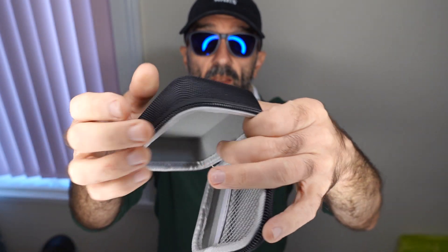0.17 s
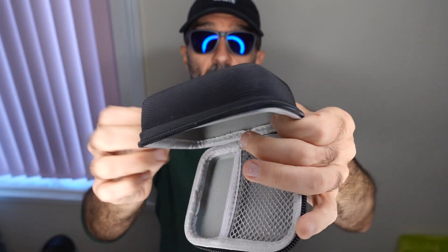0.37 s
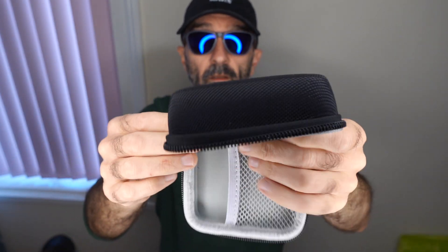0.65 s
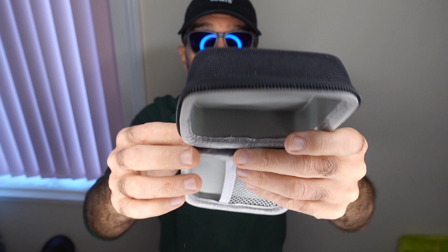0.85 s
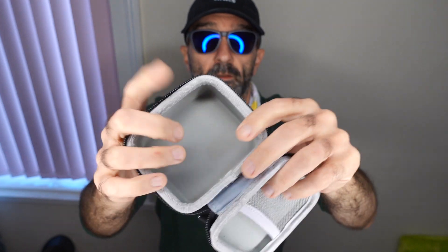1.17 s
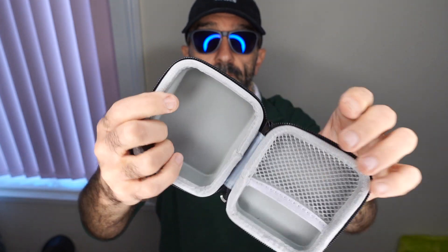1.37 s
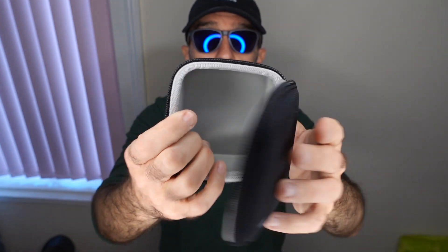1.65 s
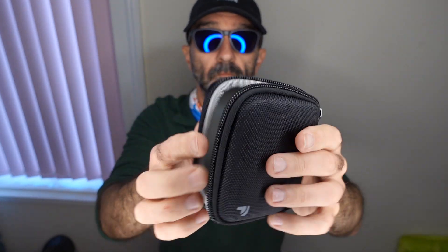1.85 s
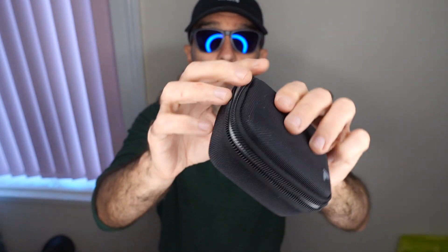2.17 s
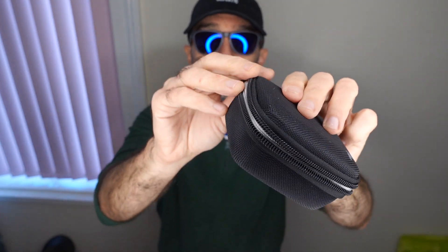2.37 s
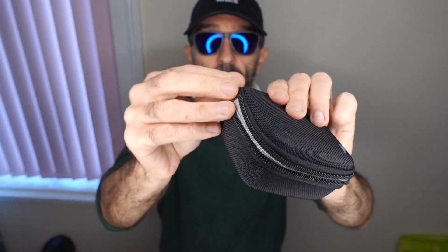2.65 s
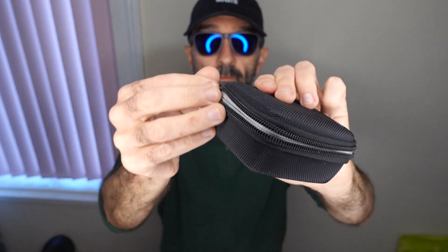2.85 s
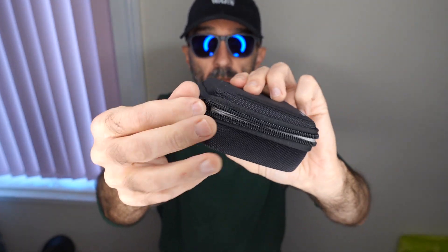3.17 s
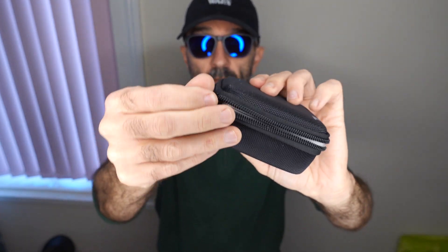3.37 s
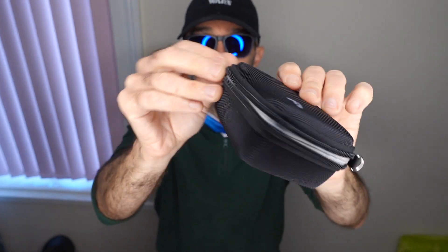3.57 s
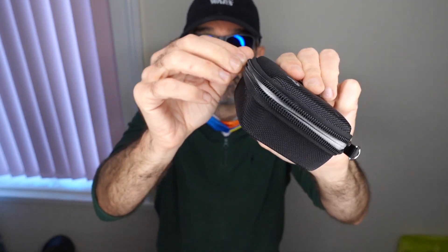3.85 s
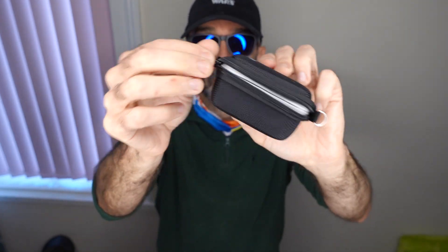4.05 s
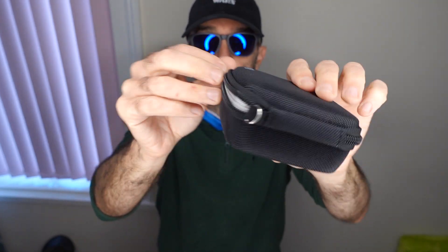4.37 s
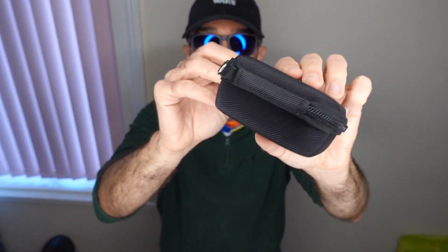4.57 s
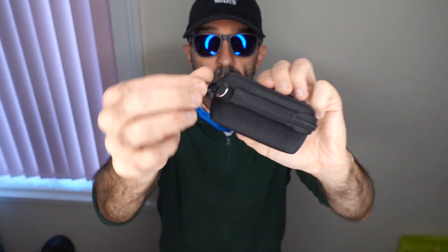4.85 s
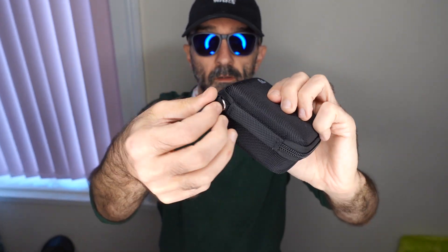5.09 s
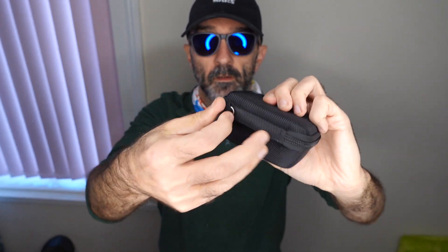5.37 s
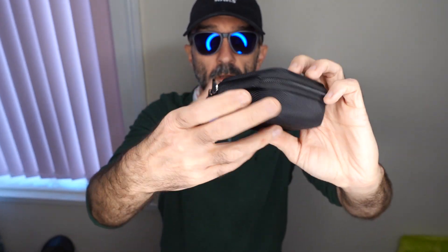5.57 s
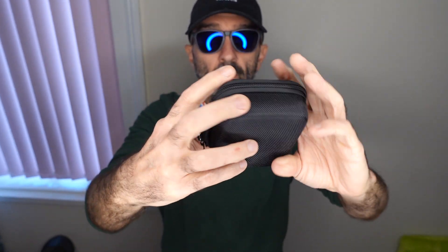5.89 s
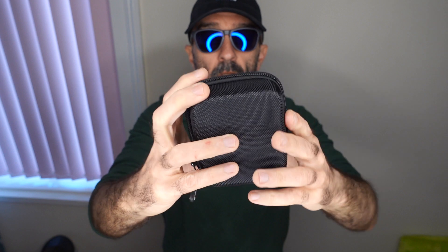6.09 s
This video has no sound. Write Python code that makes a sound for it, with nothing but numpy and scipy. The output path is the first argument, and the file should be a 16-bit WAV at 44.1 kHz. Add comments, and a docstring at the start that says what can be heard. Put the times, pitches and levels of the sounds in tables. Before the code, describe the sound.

Close scratchy rubbing on a woven hollow shell, sharp ticks and a firm closing knock, then three brief zipper pulls and final taps.

```python
"""Closing and zipping a small hard case

Hands turn a fabric-covered hard case close to two microphones, fold it shut and zip it in three pulls.
Grainy noise scrapes the weave and drums the hollow shell; filtered impulses tick, decaying modes knock.
Each zip pull is a buzz of harmonics gliding with the tooth rate, led into by single teeth.
A small room answers over a low rumble; the hands wander from the left to the right."""
import sys
import numpy as np
from scipy import signal
from scipy.fft import rfft, irfft, next_fast_len
from scipy.io import wavfile
from scipy.ndimage import uniform_filter1d, map_coordinates

SR = 44100
rng = np.random.default_rng(int(sys.argv[2]) if len(sys.argv) > 2 else 0)


def persist_wave(psi):
    """Save psi, clipped to +-1, as 16-bit WAV."""
    counts = np.round(np.clip(psi, -1, 1) * 32767).astype(np.int16)
    wavfile.write(sys.argv[1], SR, np.atleast_2d(counts).T)


N = 274302
TIME = np.arange(N) / SR

# relative spectrum of skin and nails on the weave: frequency_hz, density_db (per Hz)
SCRAPE_SPECTRUM = [(300, -61), (900, -7.5), (1500, -3), (2200, -0.75), (4800, 0.5), (6600, -1), (8200, -13),
                   (10000, -15.5), (11500, -22.5), (16000, -26)]


def gain_of(db):
    """Amplitude factor for a level in dB."""
    return 10 ** (np.asarray(db) / 20)


def evened(x):
    """Scales x to an RMS of one."""
    return x / np.sqrt(np.mean(x ** 2) + 1e-20)


def read(points, hz):
    """A spectrum joined by straight lines on a log-frequency axis."""
    f, value = np.transpose(points)
    return np.interp(np.log(hz + 1), np.log(f), value)


def curves(rows, t=TIME):
    """Every column of a table of (s, value, ..) rows at the times t."""
    s, *columns = np.transpose(rows)
    return [np.interp(t, s, c) for c in columns]


def add(mix, s, sound):
    """Mixes a sound in at s seconds, cut off at the end of the mix."""
    part = mix[:, round(s * SR):][:, :sound.shape[-1]]
    part += sound[..., :part.shape[1]]


def colour(x, points):
    """Filters x by a spectrum."""
    n = x.shape[-1]
    size = next_fast_len(n)
    gain = gain_of(read(points, np.fft.rfftfreq(size, 1 / SR)))
    return irfft(rfft(x, size) * gain, size)[..., :n]


def pair(n):
    """White noise at the two microphones: alike in the bass, less so in the treble."""
    # left-right likeness: frequency_hz, correlation (0 to 1)
    likeness = [(40, 1), (80, 0.81), (150, 0.89), (700, 0.93), (1400, 0.55), (5000, 0.11)]
    a, b = rfft(rng.standard_normal((2, n)))
    same = np.clip(read(likeness, np.fft.rfftfreq(n, 1 / SR)), 0, 1)
    mid = a * np.sqrt((1 + same) / 2)
    side = b * np.sqrt((1 - same) / 2)
    return irfft(np.array([mid + side, mid - side]), n)


def rumble(level_db=-50):
    """A steady low noise behind the handling."""
    # relative spectrum: frequency_hz, density_db (per Hz)
    rumble_spectrum = [(20, -2), (100, 4), (200, 0), (600, -7), (16000, -64)]
    return gain_of(level_db) * evened(colour(pair(N), rumble_spectrum))


def room(x, gap_s=0.011, standing_t60=0.43):
    """A small room: a diffuse tail whose decay varies with frequency, and standing waves that sing on."""
    # diffuse tail: frequency_hz, t60_s, level_db
    bands = [(148, 0.19, -5), (260, 0.7, -1.5), (480, 0.63, -10.5), (1200, 0.59, -9.5), (2950, 0.34, -5.5),
             (14000, 0.54, -17)]
    # standing waves: pitch_hz, level_db
    standing = [(405, -61), (444, -63), (590, -55.5), (615, -60), (1170, -61), (1205, -60)]
    bin_hz, t, z = signal.stft(pair(SR * 3 // 4), SR, nperseg=256)
    t60, wet_db = (read(np.array(bands)[:, [0, column]], bin_hz)[:, None] for column in (1, 2))
    energy = t60 * SR / np.log(1e6)  # of the decay, so that level and length stay independent
    decaying = z * gain_of(wet_db - 60 * t / t60) / np.sqrt(energy)
    tail = signal.istft(decaying, SR, nperseg=256)[1]
    t = np.arange(tail.shape[1]) / SR
    for hz, standing_db in standing:
        tail += gain_of(standing_db - 60 * t / standing_t60) * np.cos(2 * np.pi * hz * t)
    fade_in = 1 - np.exp(-(t / gap_s) ** 2)
    return signal.fftconvolve(x, tail * fade_in, axes=1)[:, :N]


def bump(db, hz=75, decay_s=0.0037, rise_s=0.00075):
    """The whole case moves as one body: a soft push of air, gone within a cycle or two."""
    t = np.arange(0, 6 * decay_s, 1 / SR)
    envelope = (1 - np.exp(-t / rise_s)) * np.exp(-t / decay_s)
    return gain_of(db) * 2 * np.sin(2 * np.pi * hz * t) * envelope


def hollow(x, fade_s=0.51):
    """The open lid cups the rubbing and colours it until it is turned away."""
    # air resonances in the lid: pitch_hz, width_hz, level_db
    resonances = [(1080, 110, 4), (2230, 720, 2)]
    ring = 0
    for hz, width_hz, db in resonances:
        ring = ring + gain_of(db) * signal.lfilter(*signal.iirpeak(hz, hz / width_hz, SR), x)
    return ring * np.exp(-(TIME / fade_s) ** 2)


def knock(db, hz, cycles=0.76, upper=1.567, upper_db=-8, rise_s=0.0014):
    """The padded shell rings briefly in two modes; db sets its energy as if spread over 6 ms."""
    t = np.arange(1800) / SR
    modes = np.sin(2 * np.pi * hz * t) + gain_of(upper_db) * np.sin(2 * np.pi * upper * hz * t)
    ring = modes * np.exp(-t * hz / cycles) * (1 - np.exp(-t / rise_s))
    # a small shell radiates little below its pitch
    ring = signal.lfilter(*signal.butter(1, hz / 2, "high", fs=SR), ring)
    return gain_of(db) * ring / np.sqrt((ring ** 2).sum() / (.006 * SR))


def click(db, hz, decay_s=0.00083, rattle_db=-11, width_share=1.0, crack_db=-15):
    """A hard contact: an impulse and rattle in a broad resonance; db sets its energy as if over 4 ms."""
    t = np.arange(500) / SR
    burst = (t == 0) + gain_of(rattle_db) * pair(len(t)) * np.exp(-t / decay_s)
    b, a = signal.iirpeak(hz, 1 / width_share, SR)
    resonance = signal.lfilter(b, a, signal.lfilter(b, a, burst))
    tick = resonance + gain_of(crack_db) * burst
    tick /= np.sqrt((tick ** 2).sum(1, keepdims=True) / (.004 * SR))
    return tick * gain_of(db)


def grains(per_s, spread_db, decay_s, count=24):
    """Fibres catching and letting go: tiny bursts at random moments, a few much larger than the rest."""
    t = np.arange(400) / SR
    out, total = np.zeros((2, N + len(t))), int(per_s * N / SR)
    bursts = [pair(len(t)) * np.exp(-t / decay_s) for _ in range(count)]
    when, chance, shape = rng.random((total, 3)).T
    size = gain_of(spread_db * np.minimum(-np.log(1 - chance), 4))
    for k, burst in enumerate(bursts):
        mine = (shape * count).astype(int) == k
        starts = (when[mine] * N).astype(int)
        at = (starts[:, None] + np.arange(len(t))).ravel()
        for ear in range(2):
            out[ear] += np.bincount(at, np.outer(size[mine], burst[ear]).ravel(), out.shape[1])
    return evened(out[:, :N])


def patchy(x, patch_db=3.0, lasting_frames=6, wide_bins=4):
    """The moving fingers load the panel differently: resonances come and go, less so in the treble."""
    hz, t, z = signal.stft(x, SR, nperseg=512, noverlap=384)
    field = rng.standard_normal(z.shape[1:])
    for _ in range(2):
        field = uniform_filter1d(field, wide_bins, 0)
        field = uniform_filter1d(field, lasting_frames, 1)
    depth = .5 + 1 / (1 + (hz[:, None] / 3500) ** 2)
    gain = gain_of(patch_db * evened(field) * depth)
    gain /= np.sqrt((gain ** 2).mean(1, keepdims=True))  # keeps the average spectrum
    return signal.istft(z * gain, SR, nperseg=512, noverlap=384)[1][:, :N]


def effort(sag_db=3.5, release_s=0.021, grip_shell_db=-8, grip_fizz_db=5):
    """Scrape, shell and fizz in dB: strokes swell, sag and die away over the light rubbing of the grip."""
    # finger and slider strokes, before the trims in rubbing(): start_s, length_s, attack_s,
    # scrape_db, shell_db (over the scrape), fizz_db (extra treble)
    strokes = [(0.0, 0.13, 0.013, -31, -3.5, 11), (0.075, 0.069, 0.055, -18, -5, 10),
               (0.485, 0.014, 0.01, -20, -3.5, -8), (0.537, 0.16, 0.11, -16, -5.5, 2.5),
               (0.715, 0.087, 0.011, -27, -24, 1.5), (0.81, 0.15, 0.053, -21.5, -12, -2),
               (1.044, 0.074, 0.085, -16, -11.5, -1.5), (1.144, 0.098, 0.12, -16, -11, -4),
               (1.248, 0.19, 0.026, -26, -31, 9), (1.639, 0.054, 0.039, -16.5, -6, 0),
               (1.705, 0.22, 0.03, -24, -14, 4.5), (1.82, 0.11, 0.076, -17, -4, -8),
               (2.19, 0.21, 0.0082, -30.5, -3.5, -1), (2.333, 0.083, 0.056, -22, -4.5, -4),
               (2.494, 0.072, 0.062, -21, -7.5, 6), (2.598, 0.13, 0.025, -27.5, -9.5, -1),
               (2.818, 0.031, 0.018, -27, -9, 4), (2.868, 0.072, 0.026, -21.5, -9.5, 9),
               (2.969, 0.2, 0.044, -17.5, -2.5, 2.5), (3.653, 0.074, 0.079, -23.5, 2, 12.5),
               (3.783, 0.088, 0.062, -20, -31, 8.5), (3.948, 0.18, 0.047, -13, -11, 2.5),
               (4.183, 0.062, 0.035, -23.5, -37, 13.5), (4.446, 0.08, 0.068, -23, -2, 11.5),
               (4.564, 0.19, 0.18, -22.5, -11, 10), (4.784, 0.053, 0.036, -11.5, -13.5, 4),
               (4.839, 0.099, 0.034, -15.5, -11.5, 1.5), (5.173, 0.021, 0.028, -12, -3.5, 4.5),
               (5.476, 0.13, 0.054, -17, -13.5, 3.5), (5.646, 0.027, 0.013, -19, -6, -8),
               (5.8, 0.061, 0.039, -29, -23, 8.5), (5.969, 0.043, 0.015, -29, -2.5, 8),
               (6.195, 0.042, 0.036, -24, 5, -1)]
    # light rubbing of the holding hand, never quite still: time_s, level_db (before the same trims)
    grip_levels = [(0.0, -26), (0.2, -36), (0.39, -41), (0.43, -45.5), (0.5, -33.5), (1.02, -33.5),
                   (1.54, -33.5), (1.97, -37), (2.17, -47.5), (2.4, -31), (2.8, -41), (3.21, -32.5),
                   (3.33, -35.5), (3.61, -30), (4.34, -33), (4.41, -37), (5.1, -43), (5.42, -43),
                   (5.72, -31.5), (5.91, -37.5), (6.2, -33)]
    grip = gain_of(curves(grip_levels)[0])
    power = np.outer(gain_of([0, grip_shell_db, grip_fizz_db]), grip) ** 2
    for start, length, attack, db, shell_db, fizz_db in strokes:
        t = np.arange(0, length + 10 * release_s, 1 / SR)
        swell = np.sin(np.pi / 2 * np.minimum(t / attack, 1)) ** 2
        sag = gain_of(db - sag_db * np.minimum(t / length, 1))
        level = swell * sag * np.exp(-np.maximum(t - length, 0) / release_s)
        add(power, start, np.outer(gain_of([0, shell_db, fizz_db]), level) ** 2)
    scrape, shell, fizz = 10 * np.log10(power)
    return scrape, shell, fizz - scrape


def rubbing(grain_share=0.44, drum_share=0.6, scrape_db=-1.27, shell_db=-1.5, fizz_hz=7500):
    """The weave scrapes under the fingers, and the same slips drum on the shell."""
    # relative spectrum of the drumming shell: frequency_hz, density_db (per Hz)
    shell_spectrum = [(40, -7.5), (140, -15.5), (260, -3.5), (410, 2.5), (550, 0), (740, 4), (900, -1),
                      (1130, -1), (1400, -10.5), (3500, -23.5)]
    scrape_level, shell_level, fizz_db = effort()
    slips = grains(per_s=1800, spread_db=3, decay_s=0.00098)
    scrape = evened(colour(grain_share * slips + (1 - grain_share) * pair(N), SCRAPE_SPECTRUM))
    treble = signal.butter(3, fizz_hz, "high", fs=SR, output="sos")
    fizz = signal.sosfiltfilt(treble, scrape)
    scrape = scrape + (gain_of(fizz_db) - 1) * fizz  # nails are brighter than skin
    shell = evened(colour(drum_share * slips + (1 - drum_share) * pair(N), shell_spectrum))
    scraping = patchy(scrape) * gain_of(scrape_level + scrape_db)
    drumming = patchy(shell) * gain_of(shell_level + shell_db)
    return scraping + drumming


def creep(start, length, per_s, tick_db, knock_db, knock_trim_db=0, uneven=0.45, spread_db=6.5):
    """Single teeth snap together at an uneven pace; each one ticks and nudges the shell."""
    teeth = np.zeros((2, round((length + .1) * SR)))
    s = 0
    while s < length:
        late, strong = rng.uniform(-0.8, 1, 2)
        add(teeth, s, click(tick_db + spread_db * strong, hz=2660))
        add(teeth, s, knock(knock_db + spread_db * strong, hz=270))
        s += np.exp(uneven * late) / per_s
    return start, teeth


def ridge_run(db, attack_s, release_s, panel_hz, skirt_db, speed, jitter, sag_db=5.5, shimmer_db=2.4,
              width_share=0.37, fall_hz=1400, rasp_db=-12, rasp_turns=0.15, count=12):
    """One pulse for each ridge or tooth: a buzz through the panel's resonance, a rasp with every pulse."""
    t = np.arange(speed[0][0], speed[-1][0], 1 / SR)
    rate, = curves(speed, t)
    level = gain_of(db - sag_db * np.linspace(0, 1, len(t)) ** 2)  # loses force toward its end
    level *= np.minimum((t - t[0]) / attack_s, 1) ** 2
    level *= np.minimum((t[-1] - t) / release_s, 1)
    # no two teeth catch alike: slow wander of the speed and of every partial
    noise = rng.standard_normal((count + 1, len(t)))
    wander = evened(signal.lfilter(*signal.butter(2, 70, fs=SR), noise))
    turns = np.cumsum(rate * (1 + jitter * wander[0])) / SR
    k = np.arange(1, count + 1)[:, None]
    partial_hz = k * rate
    panel = 1 / (1 + 1j * (partial_hz / panel_hz - panel_hz / partial_hz) / width_share)
    response = (panel + gain_of(skirt_db)) / (1 + (partial_hz / fall_hz) ** 4)
    response = response * gain_of(shimmer_db * wander[1:])
    scatter = rng.random((count, 1))  # the shell delays each partial differently
    buzz = evened((response * np.exp(2j * np.pi * (k * turns + scatter))).real.sum(0))
    rasp = evened(colour(pair(len(t)) * np.exp(-(turns % 1) / rasp_turns), SCRAPE_SPECTRUM))
    return t[0], (buzz + gain_of(rasp_db) * rasp) * level


def scene(knock_db=-1):
    """All the handling comes from where the hands are; the room adds its tail and a low rumble."""
    # the case shifting in the hands with a dull bump: start_s, level_db
    bumps = [(0.5, -30), (0.629, -25), (0.74, -25.5), (1.109, -29), (1.251, -27), (1.659, -29),
             (1.877, -24), (5.199, -27), (6.209, -21)]
    # fingertips and lid knocking the shell: start_s, level_db (before the trim knock_db), pitch_hz
    knocks = [(0.1215, -29, 810), (0.493, -26, 714), (0.4961, -17.5, 550), (0.553, -21.5, 690),
              (0.573, -23.5, 1150), (0.669, -17, 420), (1.244, -29.5, 181), (1.533, -26, 1290),
              (1.6563, -22, 246), (1.6706, -17.5, 1250), (1.744, -22.5, 1060), (1.7885, -28, 940),
              (1.9081, -18.5, 890), (1.9358, -16.5, 580), (1.9431, -9, 446), (2.178, -38, 895),
              (2.2007, -14, 580), (2.3238, -27.5, 700), (2.3986, -21, 900), (3.383, -33, 190),
              (3.997, -25.5, 516), (4.1079, -22.5, 420), (5.2022, -21, 730), (5.5208, -18, 930),
              (5.5939, -19, 680), (5.604, -20.5, 630), (5.6288, -21.5, 780), (5.646, -17, 780),
              (5.652, -26.5, 696), (5.7856, -26.5, 900), (5.9744, -33, 750), (6.2131, -18.5, 198)]
    # nails, the slider and its pull ring ticking: start_s, level_db, centre_hz
    clicks = [(0.1203, -24, 3000), (0.493, -20, 2590), (0.506, -20, 4200), (0.5533, -18.5, 2540),
              (0.5725, -25, 2270), (1.4119, -16, 4640), (1.42, -13, 3960), (1.457, -13, 3970),
              (1.4886, -21, 4400), (1.5286, -23, 4340), (1.5497, -25, 5500), (1.5888, -18.5, 3370),
              (1.6336, -21, 5240), (1.656, -22, 3530), (1.6608, -14, 5700), (1.6713, -20, 5100),
              (1.6763, -24, 3780), (1.745, -20, 4050), (1.7883, -7.5, 5560), (1.9096, -14, 2460),
              (1.9358, -17, 3600), (2.2005, -22.5, 2920), (2.2719, -23, 2950), (2.3241, -18.5, 3760),
              (2.3992, -19, 2100), (2.4232, -23, 2390), (3.384, -24.5, 3000), (5.5208, -8, 4340),
              (5.595, -13.5, 2920), (5.6464, -8.5, 2200), (5.6513, -18, 2800), (5.6753, -29, 2200),
              (5.7854, -19, 2000), (5.9746, -19.5, 2230)]
    # the slider creeping tooth by tooth into each pull: start_s, length_s, teeth_per_s, tick_db, knock_db
    creeps = [(2.894, 0.091, 55, -36, -28), (3.866, 0.09, 56, -28, -40.5), (4.744, 0.075, 100, -21, -40)]
    # a squeak along the weave, then three zip pulls, the last one ending in a squeal:
    # level_db (of the buzz, before its envelope), attack_s, release_s, panel_hz (resonance),
    # skirt_db (partials outside it), speed [(time_s, ridges_per_s), ..], jitter (share of the speed)
    runs = [(-23.5, 0.022, 0.02, 1000, -14, [(1.85, 930), (1.9, 1080), (1.937, 950)], 0.022),
            (-13.5, 0.04, 0.05, 250, -18, [(2.98, 160), (3.02, 255), (3.037, 203), (3.06, 222),
            (3.085, 222), (3.125, 203), (3.17, 160)], 0.04), (-17, 0.03, 0.035, 660, -11, [(4.01, 300),
            (4.027, 330), (4.043, 385), (4.06, 410), (4.08, 392), (4.1, 325), (4.125, 300)], 0.007),
            (-13, 0.018, 0.015, 1220, -19, [(4.812, 270), (4.827, 560), (4.838, 610), (4.85, 545),
            (4.865, 595), (4.882, 600)], 0.008)]
    # where the hands are: time_s, left_lag (samples), left_over_right_db
    hands = [(0, -6, 3), (0.6, 2.5, 0), (1.2, 2.5, -1), (1.7, -3.5, 0), (2.3, 8, -2), (3.75, 7.5, -2),
             (4.1, 7.5, -1.7), (5.7, 6.5, -2), (6, 4, -1)]
    case = rubbing()
    case += hollow(case)
    for row in runs:
        add(case, *ridge_run(*row))
    for row in creeps:
        add(case, *creep(*row))
    for s, db, hz in clicks:
        add(case, s, click(db, hz))
    for s, db, hz in knocks:
        add(case, s, knock(db + knock_db, hz))
    for s, db in bumps:
        add(case, s, bump(db))
    lag, pan_db = curves(hands)
    case[0] = map_coordinates(case[0], [np.arange(N) - lag], order=5)
    case *= gain_of(np.array([pan_db, -pan_db]) / 2)
    return case + room(case) + rumble()


def record(dry, balance_db=-0.43, edge_hz=15950):
    """The left side is a little weaker; peaks beyond full scale clip; then a steep low-pass."""
    balance = gain_of(np.array([[balance_db], [-balance_db]]) / 2)
    loud = np.clip(dry * balance, -1, 1)
    low_pass = signal.firwin(511, edge_hz, window=("kaiser", 9), fs=SR)
    return signal.oaconvolve(loud, low_pass[None], "same")


dry = scene()
out = record(dry)
persist_wave(out)
```